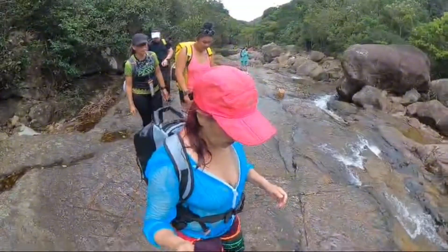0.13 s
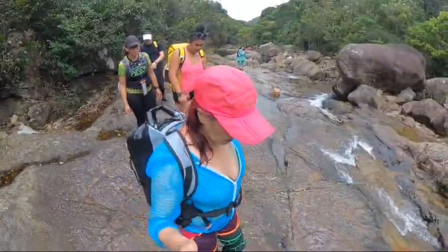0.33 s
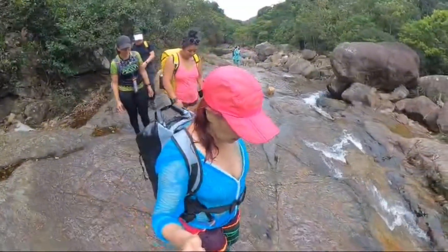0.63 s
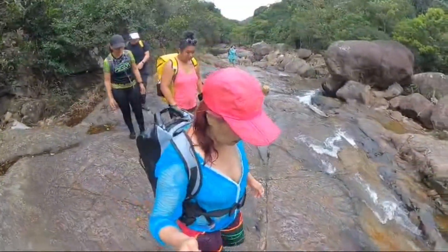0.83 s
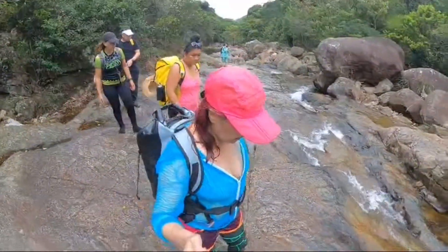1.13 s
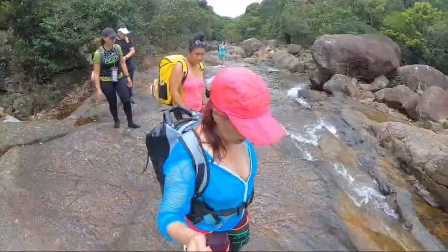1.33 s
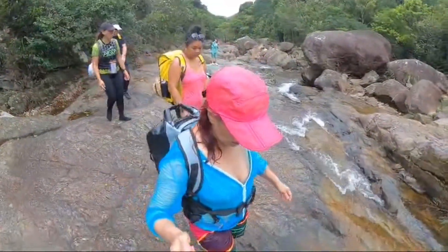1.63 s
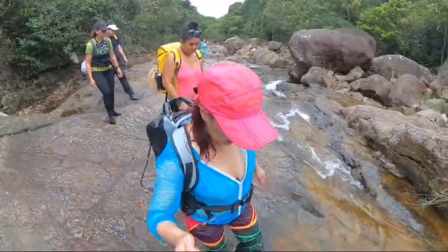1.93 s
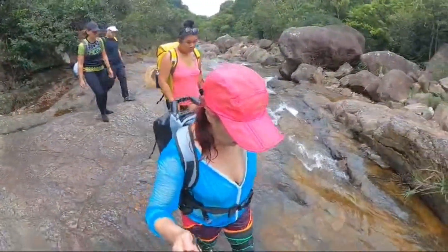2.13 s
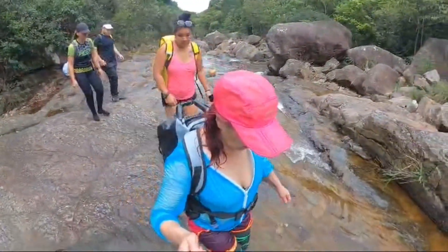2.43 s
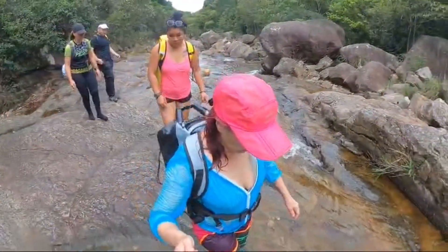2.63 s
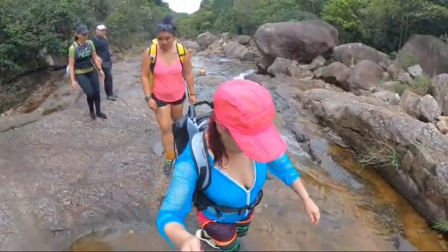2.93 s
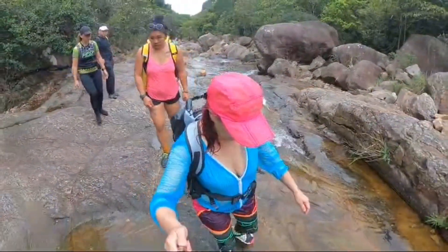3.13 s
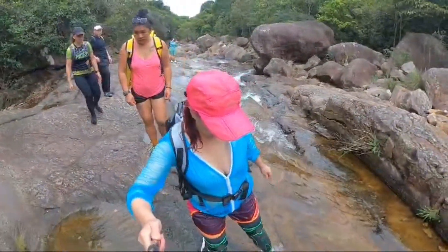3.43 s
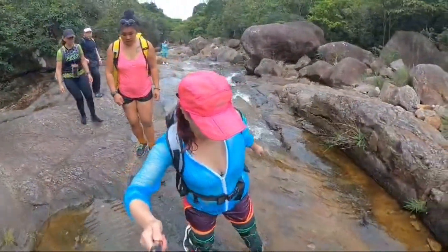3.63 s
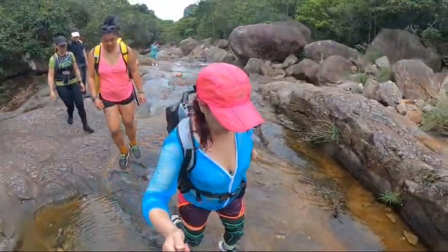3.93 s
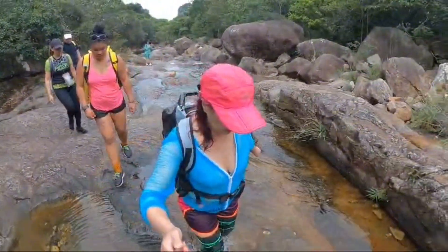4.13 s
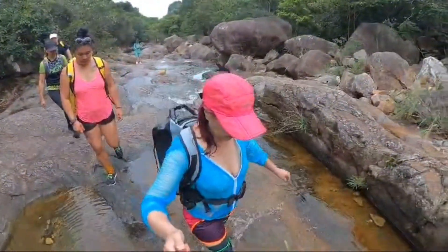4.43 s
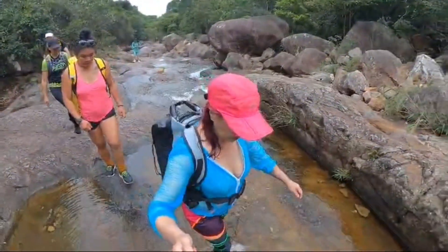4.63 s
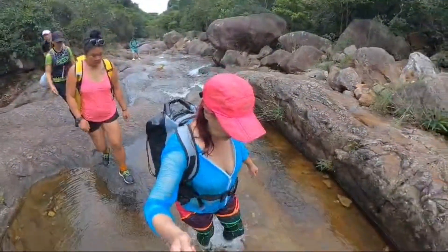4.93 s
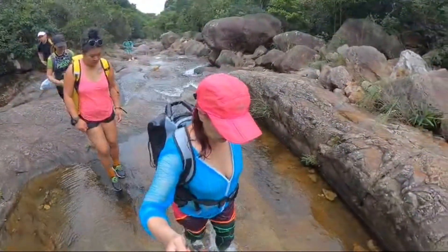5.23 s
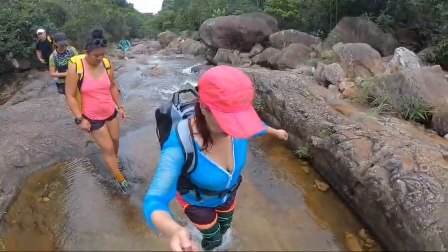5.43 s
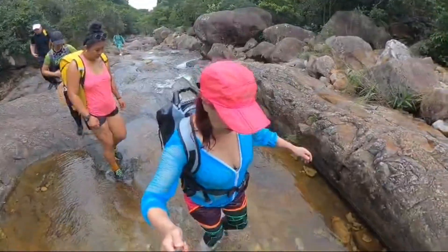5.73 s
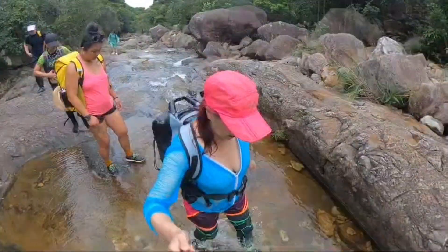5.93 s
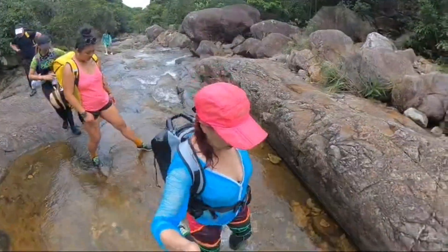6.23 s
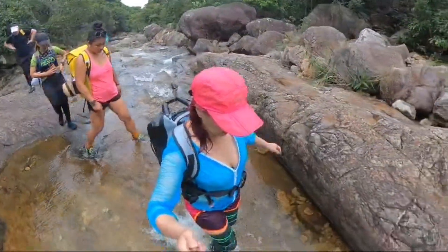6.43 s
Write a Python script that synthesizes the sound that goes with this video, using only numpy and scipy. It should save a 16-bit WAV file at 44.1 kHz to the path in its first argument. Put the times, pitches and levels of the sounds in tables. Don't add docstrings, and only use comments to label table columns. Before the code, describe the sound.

Outdoors in a shallow rocky stream, a microphone on a hand-held pole is buffeted by deep, irregular wind thumps. Behind them water rushes continuously, gurgling and hissing, growing closer as walkers wade in. A hollow double knock comes near one second and a sharper one after three. Sparse ticks and drops dot the first half, then soft boot plops and splashes near the end. No speech.

```python
import sys
import numpy as np
from scipy import signal
from scipy.fft import rfft, irfft, next_fast_len
from scipy.io import wavfile
from scipy.ndimage import uniform_filter1d, map_coordinates

SR = 44100
rng = np.random.default_rng(int(sys.argv[2]) if len(sys.argv) > 2 else 0)


def wrap_up_sound(samples):
    columns = np.atleast_2d(samples).T
    tamed = np.clip(columns, -1, 1)
    steps = np.round(tamed * 32767).astype(np.int16)
    wavfile.write(sys.argv[1], SR, steps)


def amplitude_ratio(level_db):
    exponent = np.asarray(level_db, float) / 20
    return 10 ** exponent


N = 291060


def unit(x):
    return x / np.sqrt(np.mean(x ** 2) + 1e-20)


def along(points, hz):
    f, v = np.transpose(points)
    return np.interp(np.log(hz + 1), np.log(f + 1), v)


def curves(rows):
    s, *cols = np.transpose(rows)
    return [np.interp(np.arange(N) / SR, s, c) for c in cols]


def wobble(rate_hz):
    s = np.arange(0, N + 64, 64) / SR
    knots = rng.standard_normal(1000)
    return np.interp(np.arange(N) / SR, s, map_coordinates(knots, [s * rate_hz]))


def filtered(x, response):
    m = next_fast_len(N + SR // 2)
    return irfft(rfft(x, m) * response(np.fft.rfftfreq(m, 1 / SR)), m)[..., :N]


def swells(rows, lull_db):
    t = np.arange(0, N + 64, 64) / SR
    gain = amplitude_ratio(lull_db) + sum(amplitude_ratio(db) * np.exp(-((t - s) / half_s) ** 2) for s, db, half_s in rows)
    return np.interp(np.arange(N) / SR, t, gain)


def lumps(spectrum, even):
    colour = lambda hz: amplitude_ratio(along(spectrum, hz))
    noise = unit(filtered(rng.standard_normal(N), colour))
    envelope = np.abs(signal.hilbert(noise, next_fast_len(N))[:N]) + 0.064
    return unit(filtered(noise / envelope ** np.clip(even, 0, 1), lambda hz: colour(hz) ** 0.5))


def wind():
    # pitch_hz, density_db_per_hz
    slow_spectrum = [(4.7, -51), (8.0, -0.5), (27, -4), (36, -10), (50, -14), (65, -30), (110, -120)]
    quick_spectrum = [(25, -17), (42, -2), (95, -13.5), (120, -37.5), (210, -120)]
    small_spectrum = [(52, -28.5), (88, -1.5), (145, -10.5), (240, -18.5), (310, -54), (530, -120)]
    # peak_s, peak_db, half_length_s
    slow_gusts = [(0.39, -27.5, 0.016), (0.59, -27.5, 0.077), (1.01, -27, 0.15), (1.23, -22, 0.027),
                  (1.36, -21.5, 0.044), (1.79, -20, 0.036), (1.9, -19.5, 0.012), (2.03, -25.5, 0.043),
                  (2.21, -29, 0.057), (2.32, -18, 0.031), (2.56, -26, 0.029), (2.67, -26, 0.025),
                  (2.85, -18, 0.046), (3.03, -20.5, 0.061), (3.24, -23.5, 0.075), (3.75, -24.0, 0.22),
                  (3.97, -24, 0.025), (4.16, -27, 0.039), (4.3, -26.5, 0.076), (4.47, -23, 0.079),
                  (4.59, -14.5, 0.03), (4.71, -22, 0.03), (4.81, -32.5, 0.092), (5.04, -28.5, 0.02),
                  (5.14, -25, 0.038), (5.38, -22.5, 0.072), (5.58, -24, 0.03), (5.83, -24.5, 0.059),
                  (5.93, -31, 0.03), (6.09, -20, 0.017), (6.29, -16.5, 0.096), (6.48, -30, 0.12)]
    quick_gusts = [(0.16, -34.5, 0.038), (0.28, -35.5, 0.026), (0.54, -39, 0.025), (0.85, -49, 0.12),
                   (0.98, -21.5, 0.026), (1.07, -25.5, 0.035), (1.47, -26, 0.02), (1.65, -43, 0.029),
                   (1.76, -33, 0.053), (1.85, -33, 0.041), (2.11, -41, 0.055), (2.28, -37, 0.048),
                   (2.35, -51, 0.02), (2.59, -57, 0.049), (2.86, -36, 0.06), (3.02, -32.5, 0.073),
                   (3.44, -36, 0.056), (3.59, -42, 0.025), (3.66, -42, 0.027), (3.76, -30, 0.03),
                   (3.9, -28.5, 0.049), (4.06, -44, 0.033), (4.12, -35, 0.016), (4.19, -32, 0.031),
                   (4.5, -41.5, 0.14), (4.61, -29, 0.016), (4.7, -44, 0.036), (4.78, -51, 0.017),
                   (4.95, -39, 0.03), (5.31, -32, 0.018), (5.44, -31.5, 0.034), (5.59, -46, 0.052),
                   (5.71, -37, 0.086), (6.05, -39, 0.067), (6.15, -44, 0.022), (6.26, -42, 0.058),
                   (6.49, -44, 0.062)]
    small_gusts = [(.15, -54, .04), (0.24, -54, 0.034), (0.36, -46, 0.04), (0.45, -58, 0.037),
                   (0.98, -46, 0.12), (1.15, -50, 0.027), (1.26, -54, 0.062), (1.36, -48, 0.065),
                   (1.5, -49, 0.066), (1.65, -48, 0.028), (1.8, -45.5, 0.072), (2.06, -45, 0.027),
                   (2.15, -62, 0.025), (2.34, -50, 0.028), (2.42, -67, 0.019), (2.56, -61, 0.035),
                   (2.67, -47, 0.028), (2.86, -61, 0.051), (3.04, -55, 0.024), (3.12, -47, 0.039),
                   (3.23, -56, 0.022), (3.37, -49, 0.029), (3.53, -61, 0.052), (3.69, -50.5, 0.065),
                   (3.9, -37.5, 0.079), (4.0, -49, .02), (4.2, -46, 0.031), (4.48, -52.5, 0.082),
                   (4.61, -52.0, 0.067), (4.72, -57, 0.027), (5.22, -49.5, 0.053), (5.64, -54.5, 0.094),
                   (5.86, -53, 0.036), (6.07, -48, 0.024), (6.17, -49, 0.027), (6.26, -46, 0.043),
                   (6.38, -50, 0.034)]
    # peak_s, peak_db, half_length_s
    last_pull = [
        (6.602, -18, .014),
    ]
    slow_lull_db, quick_lull_db, small_lull_db = -31.5, -40.5, -55
    lean_db, apart_db = -38, -39.5
    ride_share = 0.25

    eddy = wobble(16)
    push = amplitude_ratio(.6 * eddy) * lumps(slow_spectrum, even=1.0)
    slow = swells(slow_gusts, slow_lull_db) * push
    quick_gain = swells(quick_gusts, quick_lull_db) * amplitude_ratio(0.48 * eddy)
    quick = lumps(quick_spectrum, even=1.0)
    small_gain = swells(small_gusts, small_lull_db) * amplitude_ratio(2.5 * eddy)
    small = lumps(small_spectrum, even=0.67)

    ride = 1 + ride_share * (np.abs(unit(push)) - 1)
    both = slow + ride * (quick_gain * quick + small_gain * small)
    both = both + rocking() - swells(last_pull, -120)
    apart = amplitude_ratio(lean_db) * slow
    apart = apart + amplitude_ratio(apart_db) * (quick_gain * quick[::-1] + small_gain * small[::-1])
    return np.array([both + apart, both - apart])


def rocking():
    # peak_s, peak_db, half_length_s, pitch_hz
    swings = [(0.047, -32.5, 0.034, 31), (0.609, -17, 0.091, 27.5), (1.017, -11, 0.082, 26.3),
              (1.453, -33, .05, 36.1), (1.852, -23.5, 0.073, 30.1), (3.649, -28.5, 0.079, 29.7),
              (3.948, -21.5, 0.077, 33.3), (4.45, -19.5, .06, 30.7), (4.947, -23, 0.034, 28),
              (5.446, -25, .05, 27.7), (6.555, -24.5, .05, 28.8)]
    t = np.arange(N) / SR
    return sum(swells([row], -120) * np.sin(2 * np.pi * hz * (t - row[0])) for *row, hz in swings)


def wind_note():
    # peak_s, peak_db, half_length_s, pitch_hz
    notes_sung = [(.05, -55, .1, 827), (.22, -56, .1, 827), (.39, -51, .07, 827), (.57, -53.5, .11, 827),
                  (.72, -55, .05, 827), (.8, -58, .04, 808), (1.21, -55, .05, 826), (1.4, -60, .1, 832),
                  (1.55, -57, .04, 795), (1.68, -59, .07, 822), (1.79, -58, .05, 840), (2.0, -58, .08, 848),
                  (2.14, -54, .05, 852), (2.22, -58, .04, 835), (2.33, -54, .05, 842)]
    waver_db, waver_hz = 1.8, 4
    t = np.arange(N) / SR
    cycles = np.cumsum(waver_hz * wobble(9)) / SR
    tones = [swells([row], -120) * np.sin(2 * np.pi * (hz * t + cycles)) for *row, hz in notes_sung]
    return np.sqrt(2) * amplitude_ratio(waver_db * wobble(5.9)) * sum(tones)


def knocks():
    # start_s, peak_db, ring_hz, upper_ring_db, t60_s
    jolts = [(0.938, -33.5, 440, -11, 0.05), (.974, -42, 495, -24, 0.061), (1.067, -38, 360, -10, 0.03),
             (1.074, -35.5, 416, -12, 0.035), (1.337, -42, 457, -17, 0.032), (1.36, -39, 466, -10, 0.033),
             (3.041, -47, 353, -12, 0.016), (3.095, -47, 360, 1, 0.015), (3.353, -28.5, 458, -3.5, 0.026),
             (3.547, -55, 524, 11, 0.019), (3.892, -45.5, 435, 2, 0.045), (4.78, -45, 650, -11, 0.099),
             (4.969, -44, 450, 3, 0.026), (5.217, -52, 373, -15, 0.029), (5.235, -62, 417, -12, 0.035),
             (5.971, -42.5, 460, -20, 0.037), (6.179, -46, 434, -4, 0.034), (6.274, -42, 438, -4, 0.081)]
    # pitch_hz, level_db
    upper_modes = [(780, -25), (1020, -6.5), (1250, -11), (1560, -9)]
    build_s = 0.0017
    out, rattle, t = np.zeros(N + SR), np.zeros(N + SR), np.arange(SR // 10) / SR
    for s, db, hz, upper_db, t60_s in jolts:
        ring = np.sin(2 * np.pi * hz * t) + 0.34 * np.sin(2 * np.pi * 0.752 * hz * t)
        for mode_hz, mode_db in upper_modes:
            phase = rng.uniform(0, 2 * np.pi)
            ring += amplitude_ratio(upper_db + mode_db) * np.sin(2 * np.pi * mode_hz * t + phase)
        shape = amplitude_ratio(db + 8.5 - 60 * t / max(t60_s, .005)) * (1 - np.exp(-(t / build_s) ** 2))
        start = round(s * SR)
        out[start:][:len(t)] += shape * ring
        rattle[start:][:len(t)] += shape * rng.standard_normal(len(t))
    clamp = lambda hz: 1 / (1 + (110 / (hz + 1)) ** 2) / (1 + (hz / 1150) ** 6)
    return out[:N] + amplitude_ratio(1.5) * filtered(rattle[:N], clamp)


def ticks():
    # start_s, peak_db, centre_hz, top_db
    cracks = [(0.08, -38.5, 3280, -29.5), (0.111, -39.5, 3560, -24), (0.151, -32, 4730, -35),
              (0.3145, -40, 3480, -33), (1.4057, -34, 3300, -26.5), (1.4676, -46, 3330, -36.5),
              (1.573, -42.5, 5500, -31), (1.6343, -31.5, 4640, -35), (1.662, -33.5, 3300, -32.5),
              (1.945, -32, 3600, -41), (1.9517, -34, 3500, -37), (2.0598, -35.5, 5330, -26.5),
              (2.331, -30, 5100, -39), (2.368, -30, 4240, -33.5), (2.4186, -34, 3770, -34),
              (2.471, -34, 5170, -25.5), (2.494, -34.5, 4800, -37), (3.553, -34, 3520, -49),
              (3.593, -36.5, 3500, -37), (3.676, -33, 3420, -36.5), (3.664, -36, 3470, -46),
              (4.357, -35.5, 4800, -48), (4.645, -35, 4800, -44), (5.333, -37.5, 3880, -44),
              (5.4517, -34, 3700, -52), (5.733, -34.5, 3700, -32.5), (5.799, -37, 5030, -32),
              (5.871, -40, 4630, -43), (5.915, -34, 4900, -44.5), (6.275, -35.5, 4800, -46.5)]
    # start_s, peak_db
    faint_drops = [(.4175, -40), (1.234, -41.5), (1.522, -45), (1.589, -48.5), (1.627, -40), (1.78, -46),
                   (1.882, -49), (2.354, -46), (2.428, -37.5), (2.634, -42.5), (2.722, -40), (3.398, -45),
                   (3.47, -41.5), (3.939, -44.5), (4.071, -43), (4.132, -40), (4.94, -37)]
    drop_hz, drop_top_db = 4800, -33.5
    out, edge, t = np.zeros(N + SR), np.zeros(N + SR), np.arange(SR // 100) / SR
    for s, db, hz, top_db in cracks + [(s, db, drop_hz, drop_top_db) for s, db in faint_drops]:
        crack = rng.standard_normal((2, len(t)))
        crack[:, 2] = 2.2
        broad = signal.lfilter(*signal.iirpeak(1.06 * hz, 1.1, SR), crack[0])
        ring = 0.44 * np.sin(2 * np.pi * hz * t) + 1.02 * broad + 0.5 * crack[0]
        shape = amplitude_ratio(db - 60 * t / 0.011) * (1 - np.exp(-t / .00005))
        start = round(s * SR)
        out[start:][:len(t)] += shape * ring
        edge[start:][:len(t)] += shape * amplitude_ratio(top_db + 13.0) * crack[1]
    body = filtered(out[:N], lambda hz: 1 / (1 + (2600 / (hz + 1)) ** 4) / (1 + (hz / 7400) ** 16))
    return body + filtered(edge[:N], lambda hz: (hz > 8300) / (1 + (hz / 13600) ** 30))


def splashes():
    # peak_s, peak_db, length_s, low_hz, high_hz
    slaps = [(0.936, -40.5, 0.007, 250, 1050), (1.078, -44.5, 0.012, 231, 1700),
             (1.339, -56, 0.049, 295, 1760), (2.495, -50, 0.0015, 1200, 2980),
             (3.031, -50, 0.0017, 120, 604), (3.102, -50, 0.0022, 120, 596),
             (3.355, -41, 0.0043, 120, 1680), (3.556, -48, 0.007, 400, 1490), (4.571, -40, 0.01, 223, 547),
             (4.561, -45, 0.032, 590, 1420), (4.545, -58, 0.076, 3300, 7340),
             (5.226, -48, 0.0085, 148, 490), (6.183, -38, 0.0089, 302, 846),
             (6.287, -46.5, 0.02, 298, 1300), (6.422, -47, 0.042, 740, 1010)]
    out, t = np.zeros(N + SR), np.arange(-SR // 8, SR // 8) / SR
    for s, db, length_s, low_hz, high_hz in slaps:
        band = signal.butter(3, [low_hz, high_hz], "band", fs=SR, output="sos")
        slap = unit(signal.sosfilt(band, rng.standard_normal(len(t))))
        out[round(s * SR) - SR // 8:][:len(t)] += amplitude_ratio(db) * np.exp(-(t / length_s) ** 2) * slap
    return out[:N]


def plops():
    # start_s, peak_db, pitch_hz, life_s
    short_tones = [(0.0796, -43, 1890, 0.0026), (0.917, -45, 450, 0.016), (0.937, -40, 970, 0.0079),
                   (1.073, -41, 550, 0.014), (1.082, -41.5, 640, .009), (1.405, -48, 1880, 0.0024),
                   (1.4055, -47, 6900, 0.0016), (2.3675, -41, 1980, .002), (2.368, -36, 3660, 0.0014),
                   (2.494, -40, 1880, 0.0026), (2.753, -46, 1800, .003), (3.032, -51, 190, 0.0045),
                   (3.034, -48, 440, .006), (3.097, -46, 406, 0.0051), (3.66, -49.5, 366, 0.026),
                   (3.693, -47, 373, 0.017), (4.2, -53.5, 372, 0.025), (4.41, -51, 464, 0.028),
                   (1.54, -49, 290, 0.015), (6.1785, -43, 880, .006), (3.096, -50, 190, 0.0038),
                   (3.354, -33.5, 200, 0.0061), (3.354, -45, 765, .005), (1.072, -39.5, 304, 0.011),
                   (3.408, -45, 1490, 0.0066), (3.549, -39, 1000, 0.0047), (3.5495, -44, 616, 0.0053),
                   (3.5517, -44, 1350, .004), (3.552, -38, 3420, 0.0027), (4.408, -43, 1540, 0.0051),
                   (4.528, -45, 977, .025), (4.686, -45, 750, 0.015), (5.216, -39, 197, 0.0057),
                   (5.217, -45, 395, 0.0091), (5.228, -45, 365, 0.027), (5.121, -70, 11200, .001),
                   (2.3535, -68, 10800, .001), (5.7995, -70, 13200, .001), (5.27, -44, 930, 0.014),
                   (5.448, -48, 1810, 0.0028), (5.639, -51, 320, 0.013), (5.898, -44, 406, 0.0099),
                   (6.178, -37, 570, 0.0075), (6.19, -43, 400, .012), (6.283, -49, 450, 0.0088),
                   (6.402, -42, 860, 0.0071), (6.42, -45, 874, 0.011)]
    rise = 0.13
    out, t = np.zeros(N + SR), np.arange(SR // 8) / SR
    for s, db, hz, life_s in short_tones:
        u = t / max(life_s, .001)
        tone = np.sin(2 * np.pi * hz * t * (1 + rise * u / 2))
        out[round(s * SR):][:len(t)] += amplitude_ratio(db) * 3 * np.e * u * np.exp(-3 * u) * tone
    return out[:N]


def patchy(patchy_db):
    z = signal.stft(rng.standard_normal((2, N)), nperseg=512)[2]
    field = uniform_filter1d(rng.standard_normal(z.shape[1:]), size=5, axis=0)
    field = uniform_filter1d(field, size=8, axis=1)
    return signal.istft(z * amplitude_ratio(patchy_db * unit(field)), nperseg=512)[1][:, :N]


def bubbles(count, centre_hz, spread, cycles, scatter_db, rise, size):
    draw, t = rng.random((count, 2)), np.arange(size) / SR
    hz = np.clip(centre_hz * np.exp(spread * rng.standard_normal((count, 1))), 150, 9000)
    life = t * hz / cycles
    tone = np.sin(2 * np.pi * hz * t * (1 + rise * life / 2)) * life * np.exp(-2 * life)
    strength = amplitude_ratio(-scatter_db * np.log(1.05 - draw[:, 1:]))
    at = (draw[:, :1] * N).astype(int) + np.arange(len(t))
    return unit(np.bincount(at.ravel(), (strength * tone).ravel(), minlength=N)[:N])


def water(spectrum, patchy_db, grains, grain_db):
    pair = unit(patchy(patchy_db))
    pair = pair + amplitude_ratio(grain_db) * np.array([grains, np.roll(grains, N // 2)])
    return unit(filtered(pair, lambda hz: amplitude_ratio(along(spectrum, hz))))


def stream():
    # time_s, loudness_db, churn_db
    flow = [(0.0, -56, 1), (0.92, -53.5, 2), (1.12, -54.5, 1), (2.63, -50, -0.5), (3.25, -52, -1.5),
            (3.47, -50.5, -2), (4.94, -50, -1), (5.39, -48.5, 1), (6.25, -47, 2), (6.4, -49, 2),
            (6.6, -51.5, -1.5)]
    # pitch_hz, density_db_per_hz
    gurgle_spectrum = [(110, -17.5), (180, -2.5), (241, -4), (456, -3), (533, -5), (747, -6), (800, 2),
                       (1040, -33), (1760, -120)]
    rush_spectrum = [(410, -31.5), (700, -7), (764, -11.5), (863, -0.5), (1050, 2), (1110, 1), (1270, -13),
                     (1450, -4.5), (1760, -9), (1920, -6), (2260, -9), (2800, -23), (3640, -35.5),
                     (6160, -120)]
    spray_spectrum = [(1410, -8.5), (2400, -6.5), (2840, -6.5), (3350, -2), (3970, -4.5), (5600, -4.5),
                      (6200, -10.5), (7310, -9.5), (8520, -27), (11100, -52.5), (18700, -120)]
    mist_spectrum = [(7500, -35), (8600, -1.5), (9500, -5), (10300, -9.5), (12500, -17.5), (13600, -28.5),
                     (14500, -54.5)]
    flow_db, churn_db = curves(flow)
    near_db = flow_db + 52
    surge_db = 0.35 * wobble(9.8)

    grains = bubbles(600, centre_hz=450, spread=0.386, cycles=3.3, scatter_db=0.5, rise=0.32, size=600)
    gurgle = water(gurgle_spectrum, 1.6, grains, -21.0)
    grains = bubbles(2000, centre_hz=1300, spread=0.445, cycles=3.98, scatter_db=1.0, rise=0.29, size=300)
    rush = water(rush_spectrum, 1.0, grains, -14.5)
    grains = bubbles(3000, centre_hz=4650, spread=.4, cycles=2.47, scatter_db=4.5, rise=0.19, size=120)
    spray = water(spray_spectrum, 1.3, grains, -14.0)
    grains = bubbles(600, centre_hz=8500, spread=.2, cycles=0.95, scatter_db=0.5, rise=.1, size=40)
    mist = amplitude_ratio(1.2 * wobble(6.2)) * water(mist_spectrum, 2.2, grains, -12.5)

    rush = rush + (amplitude_ratio(0.55 * near_db) - 1) * filtered(rush, lambda hz: hz > 1270)
    out = amplitude_ratio(-55 + 0.47 * near_db + churn_db + surge_db) * gurgle
    out = out + amplitude_ratio(-49.5 + 0.25 * near_db + 0.32 * churn_db + surge_db) * rush
    return out + amplitude_ratio(-54.5 + 0.94 * near_db + surge_db) * (spray + amplitude_ratio(-26.5) * mist)


def ports(pair):
    # pitch_hz, likeness, left_lead_rad, left_minus_right_db
    port_table = [(250, .992, 0, 0), (700, .997, 0, 0), (1050, .98, .1, 0), (1350, .55, -.2, -2.2),
                  (1720, .88, -.6, -1.7), (2400, .95, -.2, 0), (2800, .91, -.1, 0), (3150, .64, -.4, 0),
                  (3700, .75, -1, 0), (4800, .81, -.6, -3.2), (5600, .91, -.1, -2), (7200, .92, 0, 0),
                  (8300, -.2, 0, .5), (9800, -.3, 0, 0), (12500, .58, 0, 0)]
    column = lambda k, hz: along(np.array(port_table)[:, [0, k]], hz)
    turn = lambda hz: np.arccos(column(1, hz)) / 2
    mid, side = filtered(pair, lambda hz: np.array([np.cos(turn(hz)), np.sin(turn(hz))]))
    half = lambda hz: amplitude_ratio(column(3, hz) / 2) * np.exp(.5j * column(2, hz))
    return filtered(np.array([mid + side, mid - side]), lambda hz: np.array([half(hz), 1 / half(hz)]))


def narrowed(pair):
    # pitch_hz, early_share, later_share
    kept_share = [(40, .06, .7), (170, .06, .4), (300, .2, .38), (550, .08, .22), (850, .22, .5),
                  (1000, .85, 1), (1950, 1, 1), (2000, .5, .55), (2900, .5, .55), (2950, 1, 1),
                  (5700, 1, 1), (5800, 1, .3), (7800, 1, .3), (7900, .8, .7)]
    # low_hz, high_hz
    whole_bands = [(0, 170), (2000, 2400), (2400, 2950), (5750, 6800), (6800, 7900)]
    change_s = 2.65
    top_hz, top_span_hz, hole_share = 10000, 3750, .8
    mid_side = np.array([pair[0] + pair[1], pair[0] - pair[1]]) / 2
    hz, t, (mid, side) = signal.stft(mid_side, SR, nperseg=2048)
    early, later = (along(np.array(kept_share)[:, [0, k]], hz)[:, None] for k in (1, 2))

    chance = rng.random((len(hz) // 4 + 1, len(t) // 2 + 1))
    chance = np.repeat(np.repeat(chance, 4, 0), 2, 1)[:len(hz), :len(t)]
    for low_hz, high_hz in whole_bands:
        draws = np.repeat(chance[hz >= low_hz][0], 1 + (low_hz > 0))[:len(t)]
        chance[(hz >= low_hz) & (hz < high_hz)] = draws
    side = side * (chance < np.where(t < change_s, early, later)) / np.sqrt((early + 2 * later) / 3)

    ceiling_hz = top_hz + top_span_hz * (1 - rng.random(len(t)) ** 6)
    holes = np.repeat(rng.random((len(hz) // 10 + 1, len(t))), 10, 0)[:len(hz)]
    holes = holes < hole_share * chance[-1] ** 2
    top = (hz[:, None] < .93 * top_hz) | ((hz[:, None] < ceiling_hz) & ~holes)
    mid, side = signal.istft(top * np.array([mid, side]), SR, nperseg=2048)[1][:, :N]
    return np.array([mid + side, mid - side])


def scene():
    near = knocks() + splashes() + ticks() + wind_note() + plops()
    return ports(stream() + near * [[1], [.3]]) + wind()


def roll_off(x):
    return signal.sosfilt(signal.butter(12, 13780, fs=SR, output="sos"), x)


def record(dry):
    return roll_off(narrowed(dry))


dry = scene()
out = record(dry)
wrap_up_sound(out)
```